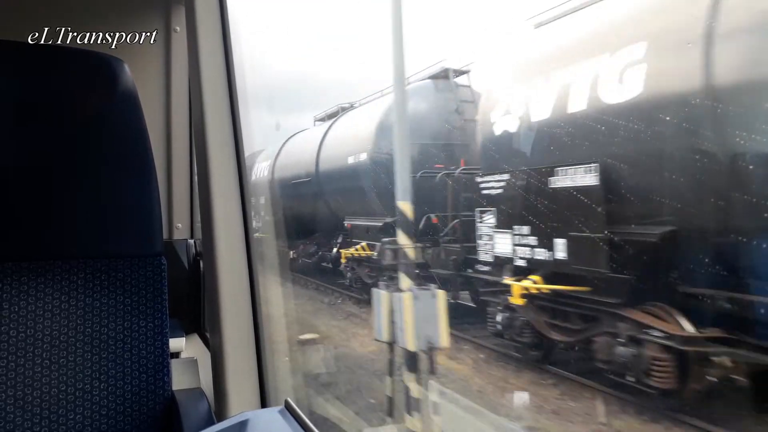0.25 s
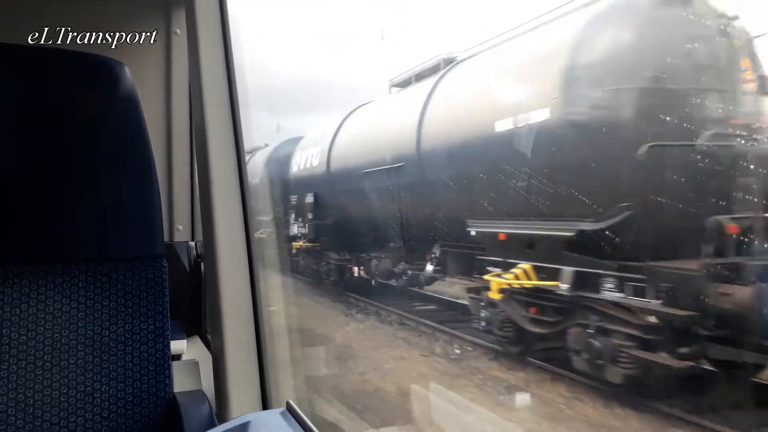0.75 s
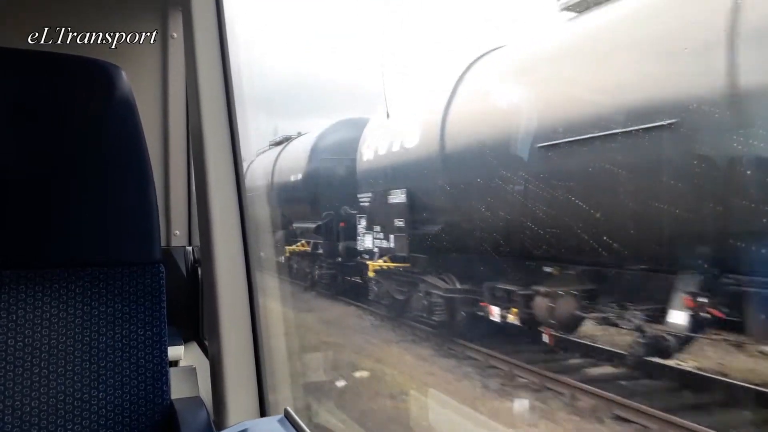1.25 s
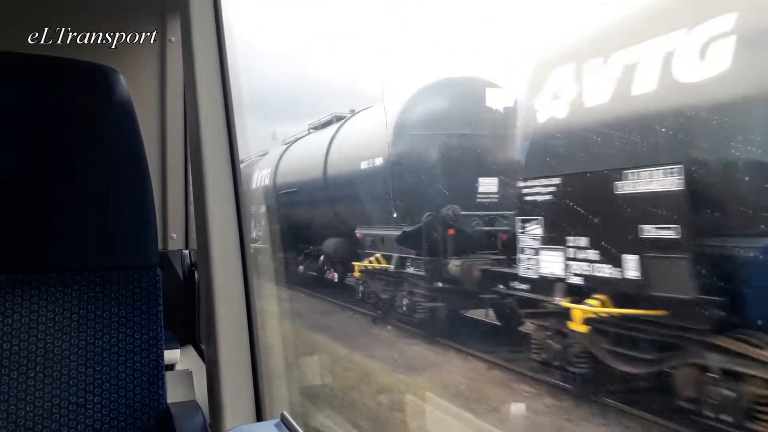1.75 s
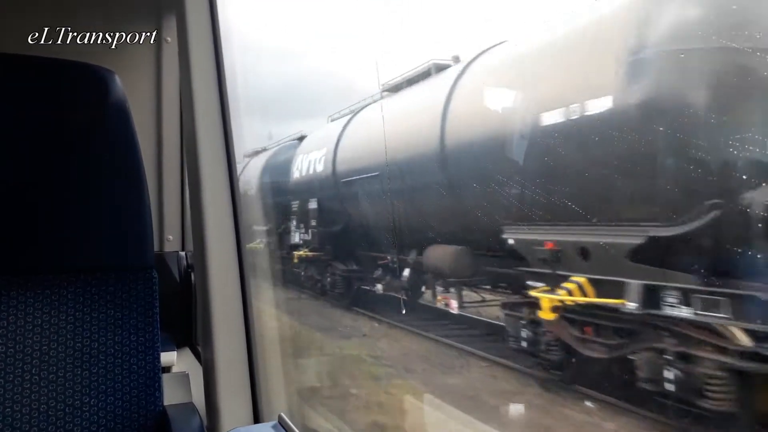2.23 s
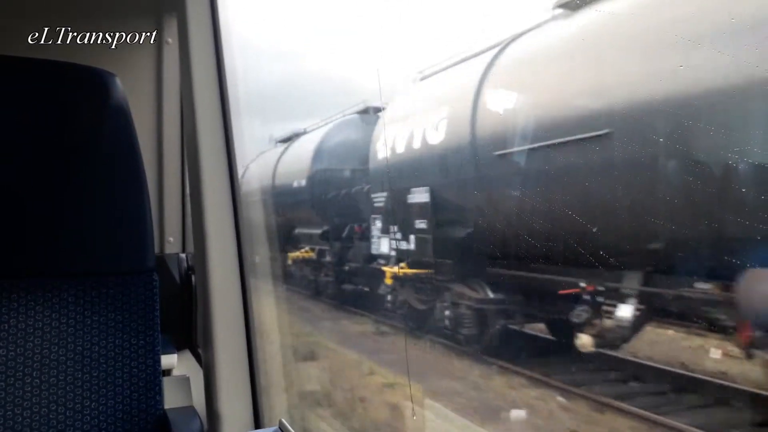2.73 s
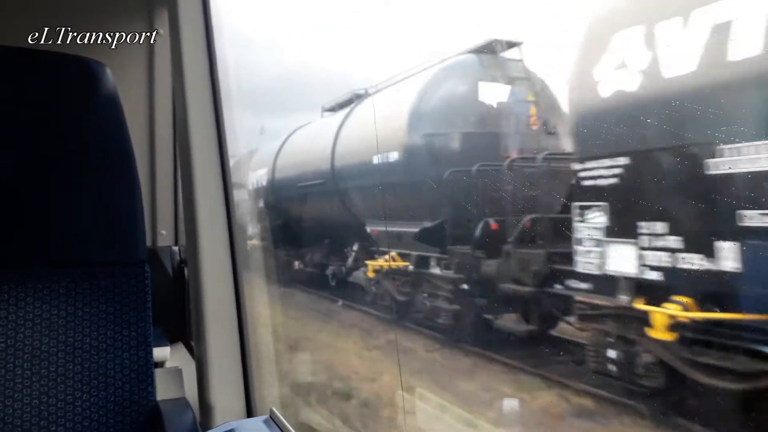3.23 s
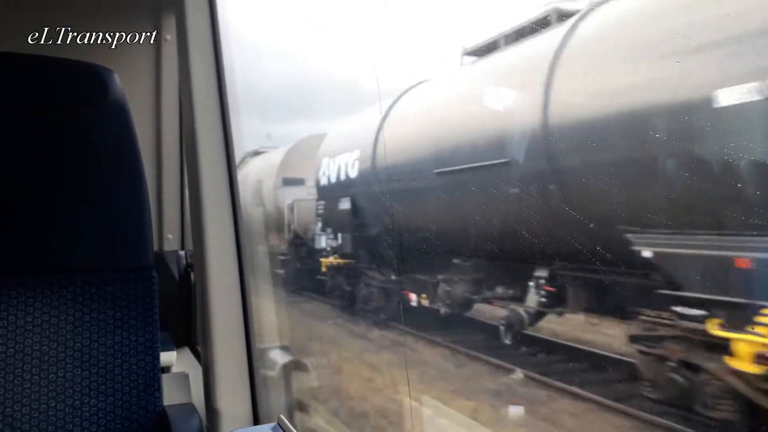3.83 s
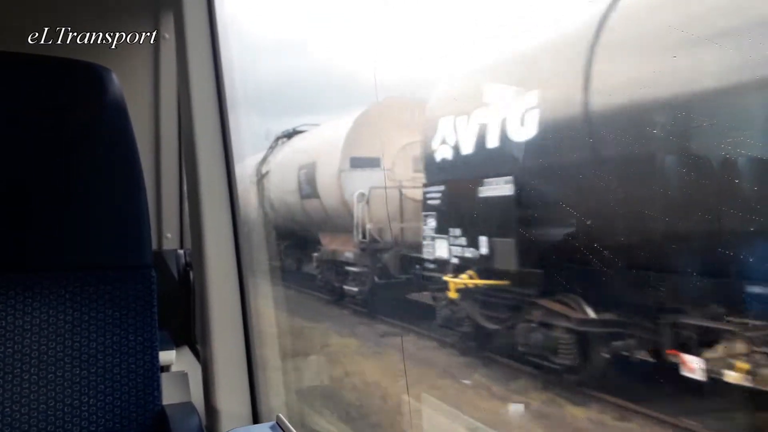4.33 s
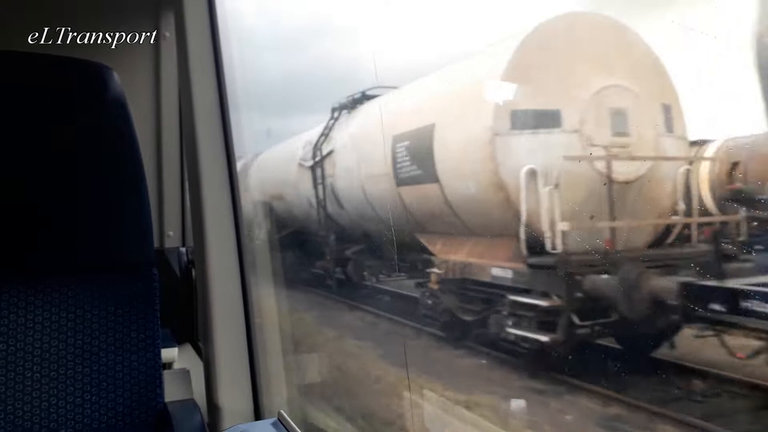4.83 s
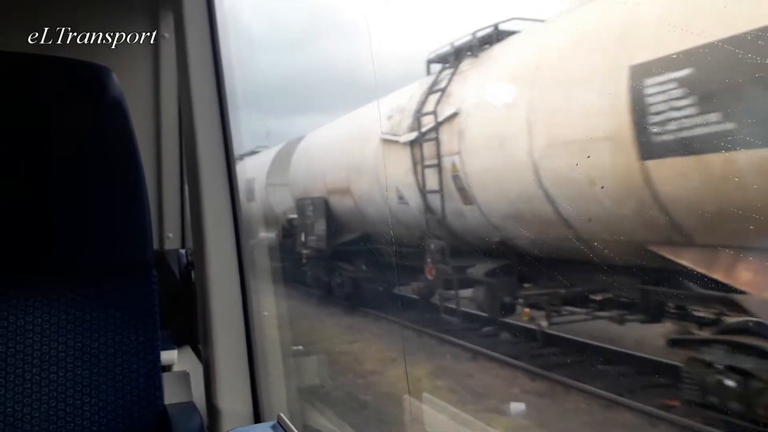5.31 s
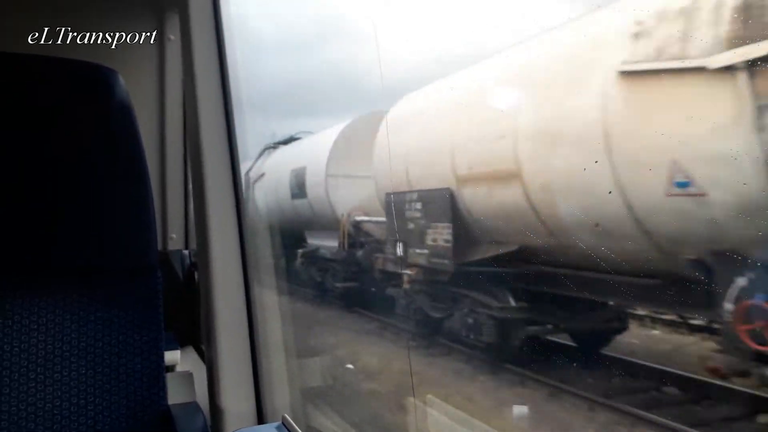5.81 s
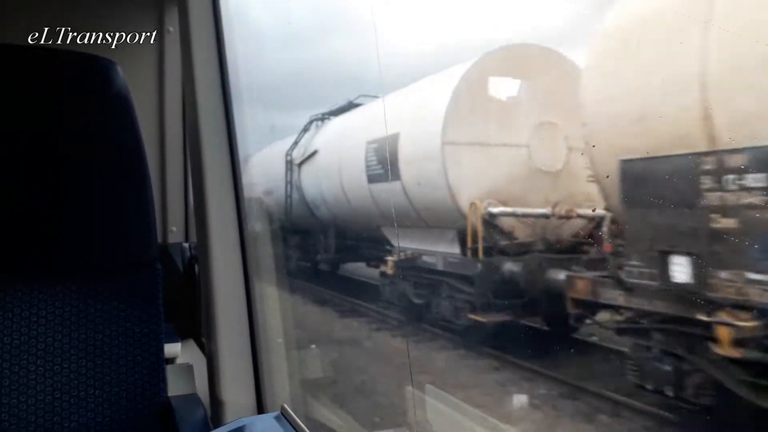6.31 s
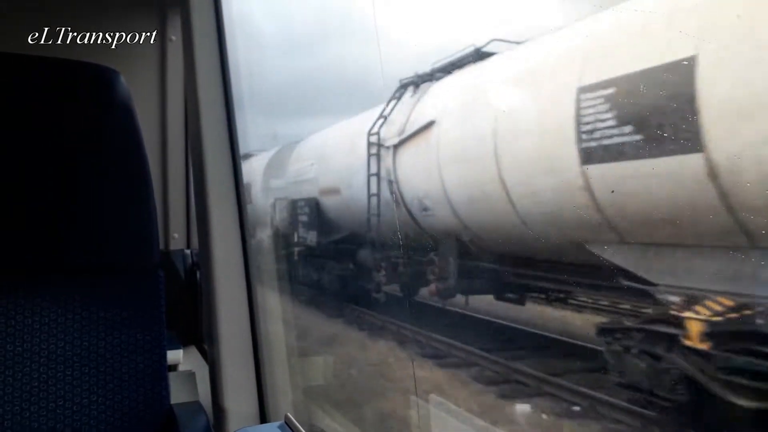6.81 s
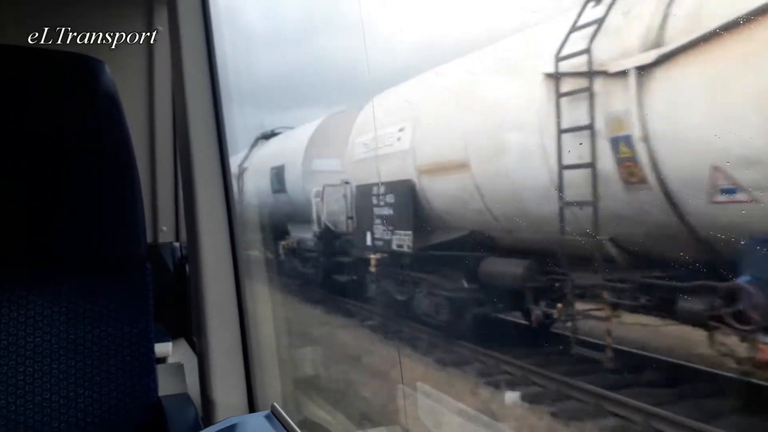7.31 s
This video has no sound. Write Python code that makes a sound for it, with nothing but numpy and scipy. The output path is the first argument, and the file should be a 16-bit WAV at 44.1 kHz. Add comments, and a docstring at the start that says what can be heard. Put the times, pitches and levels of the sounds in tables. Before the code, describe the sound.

Heard from a passenger seat: deep rolling train rumble, dull double wheel knocks, hissy rattling fittings, and short high squeaks, heaviest near six seconds.

```python
"""Rolling rumble inside a diesel railcar in a yard: shaped noise, with narrow noise booming on low body modes.
Loose parts hiss and tick as noise bands and bursts; fittings ping as sines with wandering pitch.
Wheels knock over joints and points as juddering sines, ringing body resonances and noise clatter.
A rubbing part squeaks in rough harmonic tones, and a faint gear whine sinks as the car slows."""
import sys
import numpy as np
from scipy import signal
from scipy.fft import rfft, irfft
from scipy.io import wavfile

SR = 44100
rng = np.random.default_rng(int(sys.argv[2]) if len(sys.argv) > 2 else 0)


def master_out(mix):
    """Clip the mix to full scale and print it as 16-bit PCM to the path in sys.argv[1]."""
    frames = np.transpose(np.atleast_2d(mix))
    ceiling = np.clip(frames, -1, 1)
    pcm = np.round(ceiling * 32767).astype(np.int16)
    wavfile.write(sys.argv[1], SR, pcm)


N = 332955  # samples


def from_db(db):
    """Turn decibels into an amplitude gain."""
    return 10 ** (np.asarray(db) / 20)


def rms_one(x):
    """Scale to rms 1."""
    return x / np.sqrt(np.mean(x ** 2) + 1e-20)


def in_time(rows):
    """Draw every automation column as straight lines between its points."""
    s, *columns = np.transpose(rows)
    return [np.interp(np.arange(N) / SR, s, column) for column in columns]


def coloured(spectrum):
    """Shape white noise with a spectrum drawn over log frequency, at rms 1."""
    hz, db = np.transpose(spectrum)
    f = np.maximum(np.fft.rfftfreq(N, 1 / SR), 1)
    shape_db = np.interp(np.log(f), np.log(hz), db, left=-99, right=-99)
    return rms_one(irfft(rfft(rng.standard_normal(N)) * from_db(shape_db), N))


def band_of(x, low_hz, high_hz):
    """Steep band-pass."""
    sos = signal.butter(3, [low_hz, high_hz], "band", fs=SR, output="sos")
    return signal.sosfilt(sos, x)


def drift(rate):
    """Slow random modulation with spread 1: smoothed noise on a 40-sample grid; a higher rate moves faster."""
    r = np.exp(-80 * np.pi * rate / SR)
    steps = rng.standard_normal(N // 40 + 2002)
    slow = signal.lfilter([1], [1, -2 * r, r * r], steps)[2000:]  # the filter has settled
    return np.interp(np.arange(N) / 40, np.arange(len(slow)), rms_one(slow))


def resonate(x, modes):
    """Sum parallel resonances with alternating signs; each peaks at its own level."""
    out = 0
    for k, (hz, width, db) in enumerate(modes):
        r = np.exp(-np.pi * width / SR)
        a = [1, -2 * r * np.cos(2 * np.pi * hz / SR), r * r]
        b = [(1 - r * r) / 2, 0, -(1 - r * r) / 2]
        out = out + (-1) ** k * from_db(db) * signal.lfilter(b, a, x + 1e-18)
    return out


def bursts(times, gains, rise_s, t60s):
    """Envelope of hits that rise, then die away by 60 dB per t60; overlapping powers add."""
    power = np.zeros(N)
    for s, gain, t60 in zip(times, gains, np.broadcast_to(t60s, len(times))):
        i = round(s * SR)
        t = np.arange(min(N - i, round(t60 * SR))) / SR
        power[i:i + len(t)] += (gain * (1 - np.exp(-t / rise_s)) * from_db(-60 * t / t60)) ** 2
    return np.sqrt(power)


# how hard the track shakes the car, before jolts and trims:
# time_s [s], rattle_db [dB], bright_db [dB], roll_db [dB]
TRACK_SHAKE = [(0, -51.5, -68, -32), (.29, -54, -69, -35), (.45, -49.5, -65, -32), (.85, -54.5, -66, -36),
               (1.16, -47.5, -62, -33), (1.33, -40.5, -48.5, -29), (1.55, -38, -50.5, -30.5),
               (1.8, -42, -56.5, -33.5), (2.0, -50, -64, -35), (2.33, -53, -66, -34), (2.46, -48, -59, -33),
               (2.75, -55, -65, -36), (2.94, -47.5, -65, -33.5), (3.28, -44.5, -52, -34),
               (3.45, -44, -56, -34), (3.62, -49, -62, -35), (4.14, -51, -70, -35.5), (4.5, -51, -63, -32),
               (4.72, -48.5, -60, -32.5), (4.85, -48, -63, -34.5), (5.19, -45, -57.5, -32.5),
               (5.8, -50, -60, -34), (6.1, -44.5, -54, -34), (6.3, -49, -63.5, -36.5),
               (6.55, -50, -57, -33.5), (6.82, -52, -67, -37.5), (7.2, -47.5, -62, -35.5),
               (7.55, -52, -61, -34.5)]
# share of a jolt reaching the rattle wash, bright wash and rolling noise: share [ratio]
JOLT_REACH = [1.03, 0.89, 0.91]


def shaking(jolt_db):
    """Track shaking sets the rattle, bright and rolling levels, and each jolt pushes them up."""
    return [db + share * jolt_db for db, share in zip(in_time(TRACK_SHAKE), JOLT_REACH)]


# car-body resonances: pitch_hz [Hz], width_hz [Hz], level_db [dB]; knocks ring the third and up
BODY_MODES = [(146.9, 18.7, -3), (165.4, 20, 1.5), (215.7, 31.8, -4.5), (315, 67, -7.5), (350, 77, -30),
              (510, 100, -25.5), (653, 33, -10)]
# spectrum of the rolling noise: freq_hz [Hz], level_db [dB per Hz]
ROLL_COLOUR = [(110, -31), (190, 1), (275, -9), (363, -7.5), (431, -13.5), (596, -13), (684, -19.5),
               (1420, -25), (1680, -31.5), (1980, -28.5), (2550, -35.5), (3000, -36), (3900, -44),
               (6600, -120)]
# spectrum of the deep rumble: freq_hz [Hz], level_db [dB per Hz]
DEEP_COLOUR = [(29, -47), (50, -12), (113, 2), (130, -12), (170, -30), (290, -120)]
# spectrum of the steady sub-bass rumble under the car: freq_hz [Hz], level_db [dB per Hz]
SUB_COLOUR = [(12, -43), (20, -15), (55, -2), (72, -24), (120, -120)]
# drawn swells of the low body boom, rising and falling by chance:
# time_s [s], level_db [dB], upper_lead_db [dB, upper mode over lower]
BOOM_SWELLS = [(0, -29.5, -4), (.12, -22.5, 9), (.29, -30, 13), (.45, -22, 9), (.65, -35.5, -1),
               (.78, -22.5, -1), (1.1, -29.5, 4), (1.35, -25.5, 3), (1.65, -29.5, 1.5), (1.95, -21, 2.5),
               (2.25, -29.5, 2.5), (2.55, -36.5, -3.5), (2.75, -24, 5), (2.9, -32, -4), (3.1, -27, -3),
               (3.4, -32.5, 1), (3.7, -23.5, 0.5), (4.1, -30.5, -1.5), (4.35, -34, -5), (4.65, -33, -3.5),
               (4.8, -28, -8.5), (5.05, -33, -11), (5.5, -25, 7.5), (5.8, -31.5, -7), (6.2, -24, 3.5),
               (6.55, -34.5, -2.5), (6.85, -24.5, -1.5), (7.05, -36, -5.5), (7.35, -24, -0.5),
               (7.55, -30.5, 6)]
# deep rumble: time_s [s], level_db [dB]
DEEP_RUMBLE = [(0.0, -53), (0.23, -43), (0.69, -37), (0.73, -48), (1.32, -28), (2.27, -38), (5.84, -34.5),
               (5.86, -25.5), (6.35, -38.5), (6.54, -26), (6.6, -36), (7.08, -38), (7.47, -33), (7.55, -41)]
SUB_DB, BOOM_TOP_DB = -53.5, -20.5  # the top is a ceiling on each mode's level
BOOM_TRADE_DB, BOOM_TRADE_RATE = 2.5, 6.6  # chance also trades the boom between the two modes


def rolling(roll_db):
    """Broad rolling noise over deep and steady sub-bass rumble, with narrow noise swelling on three body modes."""
    (boom_db, lead_db), (deep_db,) = in_time(BOOM_SWELLS), in_time(DEEP_RUMBLE)
    trade_db = lead_db / 2 + BOOM_TRADE_DB * drift(BOOM_TRADE_RATE)
    mode_levels = [boom_db - trade_db - 0.5, boom_db + trade_db - 0.5, roll_db + 1.5]
    out = from_db(deep_db) * coloured(DEEP_COLOUR) + from_db(SUB_DB) * coloured(SUB_COLOUR)
    for db, (hz, width, _) in zip(mode_levels, BODY_MODES):
        narrow = resonate(rng.standard_normal(N), [(hz, 0.91 * width, 0)])
        boom = resonate(narrow, [(hz, 5.7 * width, 0)])
        out += from_db(np.minimum(db, BOOM_TOP_DB)) * rms_one(boom)
    roll = coloured(ROLL_COLOUR)
    roll = roll / np.std(band_of(roll, 300, 1500))  # levelled by its midrange
    return out + from_db(roll_db - 1.5 + .6 * drift(10)) * roll


# spectrum of the rattle wash: freq_hz [Hz], level_db [dB per Hz]
RATTLE_COLOUR = [(530, -16), (900, -2), (1080, -6), (1160, -9.5), (1660, -8.5), (2070, -10), (2700, -12),
                 (4670, -6), (5760, -15.5), (6970, -20), (8000, -25.5), (10400, -72), (17600, -120)]
# spectrum of the bright wash: freq_hz [Hz], level_db [dB per Hz]
BRIGHT_COLOUR = [(3240, -36), (5500, -12), (5870, -9.5), (6300, -8), (6810, -18), (8330, -5), (8930, -14),
                 (11500, -10.5), (14000, -19), (15600, -19)]


def washes(rattle_db, bright_db):
    """Many small unresolved rattles merge into uneven hiss, made as two coloured noises."""
    rattle = coloured(RATTLE_COLOUR) * from_db(rattle_db + 1.2 * drift(19))
    bright = coloured(BRIGHT_COLOUR) * from_db(bright_db + 1.2 * drift(9))
    return rattle + bright


# gear mesh before flicker: time_s [s], pitch_hz [Hz], level_db [dB rms]
GEAR_WHINE = [(0, 2883, -59.5), (0.6, 2890, -60.5), (3.3, 2889, -58.5), (4.4, 2873, -61),
              (5.8, 2852, -62.5), (7.55, 2813, -63)]
# shaft orders before flicker: pitch_multiple [ratio to mesh], level_db [dB over mesh]
SHAFT_ORDERS = [(5 / 48, 14), (1 / 8, 19), (5 / 24, 9), (1 / 4, 3), (29 / 96, 3), (3 / 8, 2)]


def drive():
    """Gear mesh tone and low shaft orders share one speed and level curve, each flickering."""
    hz, db = in_time(GEAR_WHINE)
    phase = 2 * np.pi * np.cumsum(hz) / SR
    out = from_db(.8 * drift(7)) * np.sin(phase + 1.1 * drift(9))
    for multiple, hum_db in SHAFT_ORDERS:
        flicker = from_db(hum_db + 3.15 * drift(8.1))
        out += flicker * np.sin(multiple * phase + 1.17 * drift(4.3))
    return np.sqrt(2) * from_db(db) * out  # sine peak from rms


# two faint narrow hisses before flicker: time_s [s], lower_db [dB rms], upper_db [dB rms]
HISS_LEVELS = [(4.7, -90, -95), (4.85, -68, -73), (5.7, -69, -75), (5.85, -80, -90), (7.0, -80, -90),
               (7.15, -70, -77), (7.55, -70, -77)]
# their resonances: pitch_hz [Hz], width_hz [Hz], level_db [dB]
HISS_RESONANCES = [(6155, 110, 0), (14350, 900, 0)]


def thin_hiss():
    """Noise passes twice through each narrow resonance, and its level flickers."""
    out, noise = 0, rng.standard_normal(N)
    for db, mode in zip(in_time(HISS_LEVELS), HISS_RESONANCES):
        narrow = rms_one(resonate(resonate(noise, [mode]), [mode]))
        out = out + from_db(db + 1.5 * drift(8)) * narrow
    return out


# trim ticks before trims: start_s [s], level_db [dB], dull_db [dB, low band against level_db]
TRIM_TICKS = [(0.2528, -29, 0.5), (0.4439, -44, -13), (0.4998, -37, 2), (0.8746, -33, -5),
              (1.0062, -38.5, 2.5), (1.1165, -35.5, 0.5), (1.1736, -28, -10), (1.2421, -32, -13),
              (1.272, -26.5, -12), (1.3094, -32, -4.5), (1.4365, -39, -4), (1.509, -28.5, -0.5),
              (1.956, -39, 4.5), (2.2538, -43, 2), (2.394, -41, 0), (2.4471, -38.5, 4), (2.5366, -38.5, -2),
              (2.5651, -42, 1), (2.5885, -33.5, 3), (2.6379, -31.5, 1.5), (2.6822, -35.5, 4.5),
              (2.917, -40, 4), (2.9796, -37, 1.5), (3.0496, -33, 1.5), (3.1787, -39, -6), (3.2021, -33, 1),
              (3.3583, -34, -7), (3.4146, -36, 3), (3.479, -36.5, 3), (3.5313, -35, -1), (3.7594, -45, 0),
              (3.807, -36, -1), (3.875, -27.5, -1.5), (4.23, -45, -4), (4.3638, -39.5, 3), (4.564, -50, -6),
              (4.6189, -42, -8), (4.7731, -30.5, -4), (4.8374, -36, 2), (4.9799, -37, 3.5),
              (5.0223, -33, 2.5), (5.1063, -39, -8), (5.238, -35, -1), (5.3398, -41, -5), (5.4321, -44, -8),
              (5.5468, -37, -6), (5.661, -36, 2.5), (5.7485, -41, 1), (5.8721, -33, -6), (5.901, -27, -1.5),
              (6.0077, -37, -15), (6.0798, -28.5, 2), (6.35, -39.5, 2), (6.3919, -42, 3),
              (6.443, -34.5, -1), (6.5465, -41.5, -1), (6.58, -45, -7), (6.688, -35.5, -3), (6.733, -43, 2),
              (6.7775, -48, -12), (6.8773, -36.5, -2), (6.922, -45, -1), (7.093, -47, 6),
              (7.1472, -40.5, -2), (7.3578, -36, -5), (7.429, -37, -1), (7.472, -34.5, 1)]
# spectrum of the ticks: freq_hz [Hz], level_db [dB per Hz]
TICK_SPECTRUM = [(760, -27), (1300, -7), (2030, 0.5), (3080, -7.5), (4970, -7), (6660, -15.5), (7700, -12),
                 (9090, -17.5), (11000, -12), (13900, -18), (15600, -18)]


def ticks():
    """Each tick of loose trim is a snap and a gritty crack with a diffuse cabin tail, shorter in the treble."""
    s, level_db, dull_db = np.transpose(TRIM_TICKS)
    grit = from_db(3.5 * rng.standard_normal(N // 12 + 1).repeat(12)[:N])  # uneven micro-contacts
    noise, out = coloured(TICK_SPECTRUM), 0
    # low edge Hz, high edge Hz, trim dB, tail t60 s
    bands = [(910, 4600, dull_db - 1.5, 0.43), (5200, 8730, -6.5, 0.38), (9700, 15100, -12, 0.27)]
    for low_hz, high_hz, db, t60 in bands:
        snap = bursts(s + 0.0027, from_db(level_db + db - 1.0), 0.00054, 0.0058)
        crack = bursts(s, from_db(level_db + db), 0.0012, 0.048)
        tail = bursts(s, from_db(level_db + db - 9.0), 0.0025, t60)
        gritty = rms_one(band_of(noise * grit, low_hz, high_hz))
        diffuse = rms_one(band_of(noise[::-1], low_hz, high_hz))
        out = out + gritty * np.hypot(snap, crack) + diffuse * tail
    return out


# pings of fittings before make-up gain:
# start_s [s], level_db [dB], pitch_hz [Hz], wander_hz [Hz, rms pitch drift], t60_s [s]
FITTING_PINGS = [(2.292, -41.5, 1070, 6, 0.25), (3.892, -40.5, 1100, 6.6, 0.2),
                 (4.562, -56, 8000, 140, 0.13), (4.615, -57, 7850, 120, .2), (4.617, -59.5, 7460, 80, .25),
                 (4.735, -53, 7850, 120, .12), (6.073, -48, 9850, 220, 0.32), (6.08, -58, 14300, 450, .3),
                 (0.445, -56.5, 10900, 500, 0.19), (0.877, -51, 10600, 710, 0.31)]


def pings():
    """Each ping is one fitting ringing, more or less evenly, near its own pitch."""
    out, t = 0, np.arange(N) / SR
    for s, db, hz, wander_hz, t60 in FITTING_PINGS:
        tone = np.sin(2 * np.pi * (hz * t + np.cumsum(wander_hz * drift(196)) / SR))
        out = out + tone * bursts([s], [from_db(db + 8.0)], 0.0025, t60)
    return out


# wheels on joints, before small time offsets and level trims:
# start_s [s], level_db [dB], clatter_db [dB], judder_hz [Hz], judder_s [s, time until the fade]
WHEEL_KNOCKS = [(1.235, -8.5, -39, 177, 0.07), (1.269, -9, -32, 146.5, 0.024),
                (1.426, -4.5, -26, 161.4, 0.019), (1.479, -13, -21.5, 157, 0.022),
                (1.73, -8.5, -47, 179, 0.046), (2.47, -29, -26, 165, 0.03), (3.449, -8, -38, 153.5, 0.014),
                (4.259, -19, -33, 147, 0.049), (5.172, -13, -25.5, 159.6, 0.041),
                (5.416, -17, -48, 182, 0.021), (5.518, -7, -27.5, 167.3, 0.021),
                (5.864, 4.5, -15, 169.6, 0.023), (6.056, -2, -15.5, 159, 0.012),
                (6.081, -5.5, -24.5, 149, 0.018), (7.167, -10.5, -30.5, 171.7, 0.054),
                (7.379, -11, -36, 163.6, 0.021)]


def knocks():
    """The floor judders and dies away, the blow rings the body modes, and the bogie clatters with it."""
    s, _, clatter_db = np.transpose(WHEEL_KNOCKS)[:3]
    judder, blows = np.zeros(N), np.zeros(N)
    for start, db, _, hz, judder_s in WHEEL_KNOCKS:
        i, t = round((start - .003) * SR), np.arange(round(.17 * SR)) / SR
        fade = from_db(-60 * np.maximum(t - judder_s, 0) / 0.19)
        envelope = np.minimum(t / 0.0086, 1) * fade
        judder[i:i + len(t)] -= from_db(db - 5.0) * envelope * np.sin(2 * np.pi * hz * t)
        blows[i] = from_db(db + 34.0)
    # a soft, wide contact
    blows = signal.sosfilt(signal.butter(2, 700, fs=SR, output="sos"), blows)
    clatter_colour = [(250, 16.0), (330, 11.5), (400, 6.0), (500, 5.5), (650, 0.5),
                      (900, -4), (1500, -13.5), (5000, -27)]  # Hz, dB per Hz
    clatter = rms_one(band_of(coloured(clatter_colour), 248, 7600))
    clatter = clatter * bursts(s - .008, from_db(clatter_db + 4.0), 0.013, 0.32)
    return judder + resonate(blows, BODY_MODES[2:]) + clatter


def jolts():
    """Every knock shakes the fittings loose for a moment: a decaying lift in dB, scaled by its strength."""
    s, level_db = np.transpose(WHEEL_KNOCKS)[:2]
    return 9 * bursts(s, from_db(level_db), 0.0088, 0.49)  # 9 dB for a 0 dB knock, before its rise


# squeaks of a rubbing part, before trims:
# start_s [s], level_db [dB], pitch_hz [Hz, strongest partial before waver]
RUB_SQUEAKS = [(1.767, -32, 4620), (1.995, -33.5, 4600), (3.098, -35, 4590), (3.142, -44, 4550),
               (3.241, -34, 4580), (3.262, -38, 4520), (3.2844, -38, 4500), (3.326, -26.5, 4650),
               (3.359, -27.5, 4600), (3.397, -30, 4770), (4.336, -31.5, 4580), (5.34, -40, 4630),
               (5.452, -34, 4570), (5.487, -34, 4620), (5.559, -22.5, 4580), (5.606, -39, 4600),
               (5.6409, -27.5, 4550), (5.68, -42, 4500), (5.907, -33, 4700), (5.9229, -30, 4560),
               (5.954, -28, 4640), (6.034, -44, 4560), (6.069, -23, 4590), (6.098, -31, 4480),
               (6.141, -22.5, 4590), (6.1724, -28, 4600), (6.196, -34, 4730), (6.267, -37, 4600),
               (6.8506, -43, 4530), (7.177, -37, 4200), (7.222, -33, 4620), (7.2494, -41, 4590),
               (7.31, -37.5, 4560), (7.439, -31.5, 4560)]
# partials: slip_multiple [ratio to slip rate], level_db [dB]
SLIP_PARTIALS = [(1, -8), (2, 2.5), (3, -16), (5, -24)]
SQUEAK_S = 0.015  # length before the fade


def squeaks():
    """Rough stick-slip tones waver and throb at random, stop short and linger faintly."""
    out, waver, throb = np.zeros(N), drift(150), from_db(4.0 * drift(150))
    for s, level_db, hz in RUB_SQUEAKS:
        i = round((s - .003) * SR)
        t = np.arange(min(round(.12 * SR), N - i)) / SR
        # the slip rate is half the listed pitch, so the second partial lands on it
        slips = np.pi * np.cumsum(hz * (1 + .011 * waver[i:i + len(t)])) / SR
        after = np.maximum(t - SQUEAK_S, 0)
        fade = .75 * from_db(-60 * after / .05) + .25 * from_db(-60 * after / .25)
        envelope = np.minimum(t / .004, 1) * fade
        tone = sum(from_db(db) * np.sin(k * slips) for k, db in SLIP_PARTIALS)
        out[i:i + len(t)] += from_db(level_db - 13.0) * envelope * tone
    return out * throb


def scene():
    """Mix everything heard from a seat, with jolts lifting the rolling noise and the washes."""
    rattle_db, bright_db, roll_db = shaking(jolts())
    track = rolling(roll_db) + knocks()
    loose_parts = washes(rattle_db, bright_db) + ticks() + pings() + squeaks()
    return (track + loose_parts + thin_hiss() + drive())[None]


def record(dry):
    """The small microphone loses the deepest bass, peaks are rounded toward full scale, the top is cut."""
    heard = signal.sosfilt(signal.butter(2, 22, "high", fs=SR, output="sos"), dry)
    rounded = heard / (1 + np.abs(heard) ** 6) ** (1 / 6)
    top_cut = signal.ellip(14, .3, 70, 15770, fs=SR, output="sos")  # cutoff in Hz
    return signal.sosfilt(top_cut, rounded)


dry = scene()
out = record(dry)
master_out(out)
```